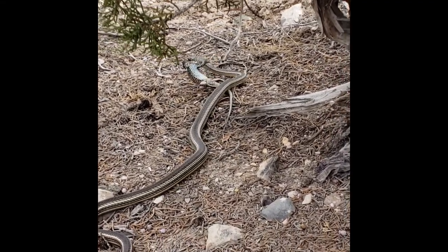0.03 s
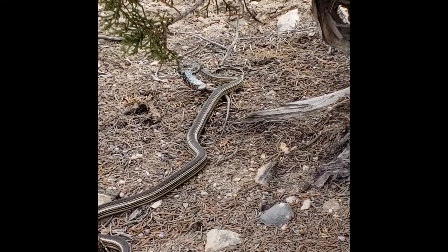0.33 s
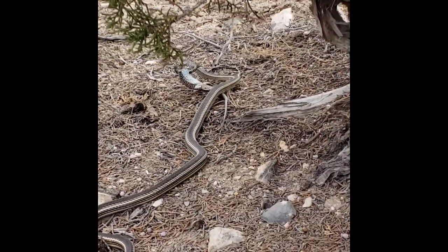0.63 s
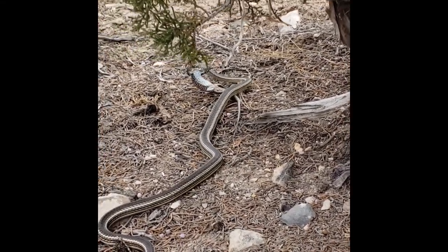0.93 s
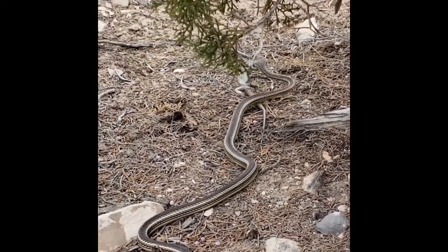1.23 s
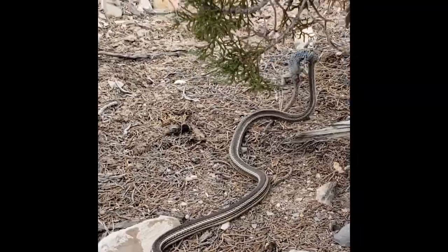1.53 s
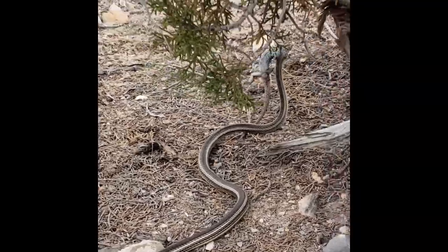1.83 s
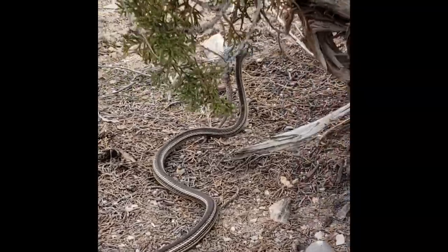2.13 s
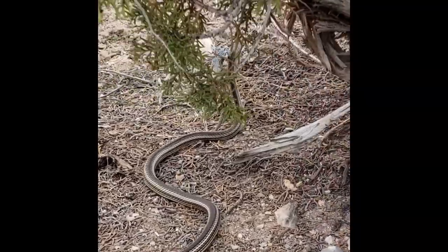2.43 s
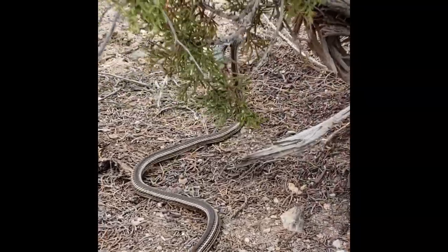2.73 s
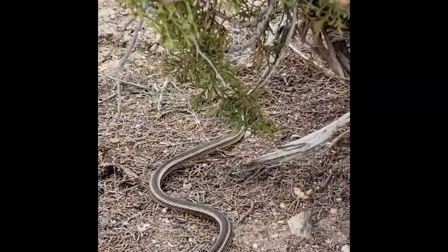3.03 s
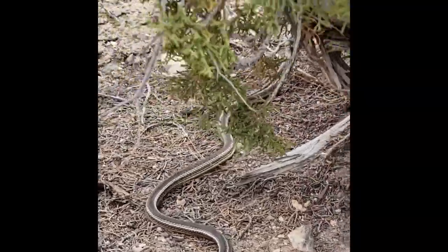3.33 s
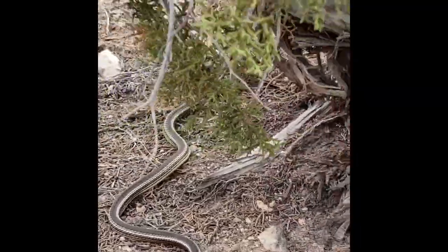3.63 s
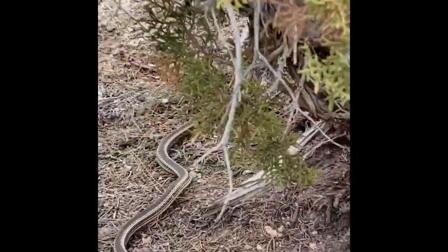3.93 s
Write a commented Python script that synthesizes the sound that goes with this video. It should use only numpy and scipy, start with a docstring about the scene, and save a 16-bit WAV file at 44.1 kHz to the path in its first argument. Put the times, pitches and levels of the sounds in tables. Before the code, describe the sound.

Faint ticking and hissing comes from a snake dragging prey over dry ground litter. Light footsteps crunch and twigs crack in the quiet open air, while a breeze rumbles on the phone microphone, gusting hard near the end.

```python
"""Outdoors, on dry needles and grit: a snake drags its prey and someone follows with scuffing steps.
Needles tick and hiss under the scales. Litter crunches underfoot, twigs snap, and sticks and
stones scrape as they catch and slip. Behind it lie quiet air, a faint hiss and a dull rustle.
A light wind flutters on the two microphone ports of a hand-held phone and ends in one gust."""
import sys
import numpy as np
from scipy import signal
from scipy.fft import rfft, irfft
from scipy.io import wavfile
from scipy.ndimage import uniform_filter1d

SR = 44100
rng = np.random.default_rng(int(sys.argv[2]) if len(sys.argv) > 2 else 0)


def master(y):
    """Save y as 16-bit WAV."""
    cut = np.clip(np.atleast_2d(y).T, -1, 1)
    pcm = np.round(cut * 32767)  # scale
    wavfile.write(sys.argv[1], SR, pcm.astype(np.int16))


N = 176400
T = np.arange(N) / SR
F = np.maximum(np.arange(N // 2 + 1) * SR / N, 1)
PORT_DELAY = np.exp(-2j * np.pi * F * 0.00048)  # the left port hears the ground 0.48 ms later


def undb(db):
    """Decibels to gain."""
    return 10 ** (np.asarray(db) / 20)


def unit(x):
    """Scale to rms 1."""
    return x / np.sqrt(np.mean(x ** 2))


def fader(rows, column=1):
    """Gain over time from a column of dB, dying away outside the rows."""
    points = np.array(rows)
    outside_s = np.maximum(points[0, 0] - T, 0) + np.maximum(T - points[-1, 0], 0)
    return undb(np.interp(T, points[:, 0], points[:, column])) * np.exp(-outside_s / 0.013)


def stereo_eq(rows):
    """Left and right gain over frequency, falling away below the first row."""
    hz, *sides = np.array(rows).T
    gain = undb([np.interp(np.log(F), np.log(hz), db) for db in sides])
    return gain * np.minimum(F / hz[0], 1) ** 2


def shape(x, gain):
    """Filter by a frequency response."""
    return irfft(rfft(x) * gain, N)


def band(hz, width):
    """Response of two like resonances in series; the width of each is a share of its centre."""
    return (1 / (1 + 1j * (F / hz - hz / F) / width)) ** 2


def waver(rate_hz):
    """Smooth random movement with rms 1."""
    return unit(shape(rng.standard_normal(N), np.exp(-(F / rate_hz) ** 2)))


def grains(per_second, spread_db):
    """Tiny fractures: clicks at random times, their sizes scattered by spread_db."""
    hits = rng.random(N) < per_second / SR
    polarity = rng.choice([-1, 1], N)
    size = undb(spread_db * np.minimum(rng.exponential(1, N), 4))
    return unit(hits * polarity * size)


def ports(x):
    """Sound from the ground reaches the left port later and duller."""
    left = shape(x, PORT_DELAY / np.sqrt(1 + (F / 1900) ** 4))
    return np.array([left, x])


# The tone of still air. Each row: frequency in Hz, left and right EQ gain in dB.
AIR_EQ = [(28.5, -13, 3), (81, -7, -4.5), (186, -16.5, -16), (487, -24, -24), (1040, -27, -28),
          (1500, -27.5, -31), (2440, -29, -36), (3900, -34.5, -35.5), (5800, -37.5, -42.5),
          (8930, -45, -47), (11300, -37, -38.5), (15000, -33.5, -35)]

def air():
    """A quiet outdoor bed, slightly restless."""
    bed = unit(shape(rng.standard_normal((2, N)), stereo_eq(AIR_EQ)))
    return bed * undb(-68.5 + 0.17 * waver(2.1))


# The drift of the background hiss. Each row: time in seconds, left level in dB, centre in Hz.
HISS_DRIFT = [(0, -75.5, 1940), (0.551, -79, 1940), (.85, -77, 1870), (1.3, -77.5, 1920),
              (2.602, -77, 2024)]

def hiss():
    """A faint, narrow hiss, mostly on the left, swells and drifts in pitch."""
    at, db, hz = np.array(HISS_DRIFT).T
    low_noise = shape(rng.standard_normal((2, N)), 1 / (1 + (F / 230) ** 2))
    carrier = np.cos(2 * np.pi * np.cumsum(np.interp(T, at, hz)) / SR)
    level = undb(np.interp(T, at, db) + 1.35 * waver(6.1))
    return unit(low_noise * carrier) * level * undb([[0], [-17]])


# The light breeze, then the closing gust.
# Each row: time in seconds, force on the left port in dB, force on the right port in dB.
BREEZE = [(0, -52.5, -61), (0.12, -52.5, -64.5), (0.35, -62.5, -60.5), (0.58, -79, -77), (0.8, -76, -76),
          (0.92, -58.5, -51.5), (1.1, -49, -86), (1.2, -55.5, -64), (1.33, -41.5, -60), (1.52, -61.5, -71),
          (1.78, -47.5, -51), (2.05, -62, -110), (2.22, -59.5, -70), (2.38, -50.5, -105),
          (2.62, -48.5, -67), (2.75, -56.5, -59.5), (2.95, -56.5, -64.5), (3.27, -43.5, -56)]
GUST = [(3.28, -45, -64), (3.34, -25.5, -40.5), (3.42, -20.5, -34), (3.48, -14, -39), (3.53, -16.5, -37),
        (3.58, -27, -41), (3.64, -32, -44), (3.71, -27, -58), (3.79, -27.5, -58.5), (3.87, -35, -63),
        (3.95, -28, -55), (4.0, -43.5, -67)]

def wind():
    """Turbulence on each port; the harder it blows, the higher the rumble reaches."""
    octaves_per_db, rolloff_order = 0.0212, 3.4
    out = np.zeros((2, N))
    for side, trim_db in enumerate((-3, 1)):
        force = fader(list(BREEZE) + list(GUST), column=side + 1) + 1e-9
        excess_db = np.maximum(20 * np.log10(force) + 45, 0)
        corner_hz = 68.1 * 2 ** (octaves_per_db * excess_db)
        noise, rumble = rng.standard_normal(N), 0
        for hz in 25 * 2 ** (np.arange(12) / 2):  # half-octave bands under a moving low-pass
            window = np.maximum(1 - np.abs(2 * np.log2(F / hz)), 0)
            part = shape(noise, window / np.sqrt(1 + (49 / F) ** 6))
            body = 1 / np.sqrt(1 + (hz / corner_hz) ** (2 * rolloff_order))
            skirt = undb(-23.5) / (1 + (hz / 450) ** 3) / (1 + force / 0.0019)  # mids in the lulls
            rumble += part * (body + skirt)
        running_rms = np.sqrt(uniform_filter1d(rumble ** 2, int(0.07 * SR)) + 1e-18)
        out[side] = rumble / running_rms * force * undb(trim_db)
    return out


# Single buffets of wind. Each row: centre time in seconds, level in dB, pitch in Hz.
EDDIES = [(0.041, -35, 46), (0.132, -44, 65.5), (1.049, -36.5, 46), (1.122, -39.5, 49), (1.387, -37, 61.4),
          (1.607, -46, 45), (1.738, -38, 54.7), (1.818, -35.5, 50.7), (2.12, -41.5, 50.4),
          (2.302, -26.5, 72), (2.5, -38.5, 60.4), (2.585, -28.5, 62.4), (3.351, -27.5, 171),
          (3.425, -17, 58), (3.4654, -9.5, 194), (3.494, -9, 216), (3.508, -23, 92), (3.53, -15.5, 64),
          (3.54, -19, 228), (3.786, -15.5, 87), (3.828, -14, 76)]

def eddies():
    """Eddies swing the pressure at the left port, steepen when strong and shed smaller ones."""
    left = np.zeros(N)
    for at, db, hz in EDDIES:
        cycles = hz * (T - at)
        swell = undb(db) * np.exp(-(cycles / 0.67) ** 2)
        swing = np.cos(2 * np.pi * cycles)
        steepening = 0.35 * swell * np.cos(4 * np.pi * cycles)
        shed = undb(-35) * unit(shape(rng.standard_normal(N), band(2.35 * hz, width=0.84)))
        left += swell * (swing + steepening + shed)
    return np.array([left, np.zeros(N)])


# Soft bumps. Each row: start in seconds, peak in dB, pitch in Hz.
BUMPS = [(1.531, -37, 147), (1.657, -37.5, 157), (1.74, -44, 218), (2.797, -38.5, 211), (3.914, -33.5, 270)]

def bumps():
    """Damped thuds at the right port, each gone in about a cycle."""
    right = np.zeros(N)
    for at, db, hz in BUMPS:
        cycles = np.maximum(T - at, 0) * hz
        envelope = (1 - np.exp(-cycles / 0.12)) * np.exp(-cycles / 0.41)
        thud = np.sin(2 * np.pi * cycles) * envelope
        right += undb(db) * thud / np.abs(thud).max()
    return np.array([np.zeros(N), right])


# The swells of the low rustle. Each row: time in seconds, right level in dB.
RUSTLE_SWELLS = [(0, -77), (.08, -64.5), (.25, -80.5), (.5, -88.5), (.95, -100), (1.05, -70), (1.18, -86),
                 (1.3, -75), (1.6, -74.5), (1.75, -77), (2.25, -94), (2.36, -73), (2.52, -91)]

def dull_rustle():
    """A dull, low rustle that swells with the movement, a little to the left."""
    rustle = unit(shape(rng.standard_normal((2, N)), band(340, width=0.85)))
    return rustle * fader(RUSTLE_SWELLS) * undb(2.4 * waver(23)) * undb([[3.5], [0]])


# Short scrapes of sticks and stones. Each row: time of the peak in seconds, level in dB,
# pitch in Hz, fade in seconds, bandwidth as a share of the pitch.
SCRAPES = [(1.308, -77.5, 3580, 0.084, 0.18), (1.552, -71.5, 2300, 0.025, 2.7),
           (1.896, -61, 665, 0.17, 0.37), (2.131, -64.5, 1280, 0.042, 0.65),
           (2.969, -61, 1070, 0.012, 0.82), (3.008, -47, 662, 0.01, .2), (3.037, -47, 596, 0.021, 0.49),
           (3.074, -58, 2590, 0.0097, 0.23), (3.509, -54, 907, 0.06, 0.25),
           (3.768, -64.5, 1430, 0.056, 0.72), (3.813, -63, 1480, 0.03, 0.53),
           (3.95, -66, 6800, 0.016, 0.58)]

def scrapes():
    """Uneven stick-slip ticks ring a stick or stone; the grip comes faster than it fades."""
    out = np.zeros(N)
    for at, db, hz, fade_s, width in SCRAPES:
        slope_s = np.where(T < at, 0.85 * fade_s, fade_s)
        swell = np.exp(-2 * ((T - at) / slope_s) ** 2)
        ticks = grains(1200, spread_db=3.5)
        out += undb(db) * swell * unit(shape(ticks, band(hz, width)))
    return ports(out)


# The ring of a twig. Each row: multiple of its pitch, bandwidth as a share of the centre, gain in dB.
TWIG_MODES = [(1, 1.0, 8.5), (2.05, 0.24, 4.5), (2.6, 0.29, -13.5), (3.7, .18, -6)]
# Twigs breaking. Each row: start in seconds, peak in dB, pitch in Hz, splinter decay in milliseconds.
SNAPS = [(0.074, -72, 704, 3), (1.052, -61.5, 700, 1.3), (1.523, -39, 1770, 1.5), (1.809, -44, 3220, 1.7),
         (1.949, -50, 3900, 2.2), (2.152, -49.5, 1350, 0.44), (2.165, -49.5, 704, 2.4),
         (2.235, -47.5, 700, 0.8), (2.305, -43.5, 1780, 1.9), (2.688, -54, 1510, 17),
         (2.962, -59, 1460, 2.6), (3.139, -51, 4500, 4), (3.435, -53, 1560, 1.1), (3.621, -54, 2620, 1.1)]

def twigs():
    """One sharp break and a burst of splinters ring each twig, then the litter faintly settles."""
    out = np.zeros(N)
    for at, db, hz, decay_ms in SNAPS:
        age = np.maximum(T - at, 0)
        fracture = np.arange(N) == int(at * SR)
        splinters = np.exp(-1000 * age / decay_ms)
        settling = undb(-20) * np.exp(-age / 0.056)
        debris = undb(-15) * rng.standard_normal(N) * (T >= at) * (splinters + settling)
        wood = sum(undb(mode_db) * band(ratio * hz, width) for ratio, width, mode_db in TWIG_MODES)
        crack = shape(fracture + debris, wood / (1 + (F / 8100) ** 4))
        out += undb(db) * crack / np.abs(crack).max()
    return ports(out)


# The tone of crunching litter. Each row: frequency in Hz, left and right EQ gain in dB.
LITTER_EQ = [(338, -6, -5.5), (633, -6.5, -7.5), (1000, -7, -2.5), (1240, -4, -3.5), (2070, -22, -14),
             (3400, -28.5, -16), (3880, -28, -9), (5280, -40, -19.5), (6700, -25.5, -20),
             (7550, -37.5, -29.5), (12300, -42, -58)]
# The steps, one list per scuff. Each row: time in seconds, crunch fader in dB, grit fader in dB.
SCUFFS = [
    [(1.73, -82, -94), (1.786, -74.5, -65), (1.936, -65, -75.5), (2.084, -78, -80), (2.132, -75.5, -77.5),
     (2.296, -77, -79.5), (2.304, -69.5, -91), (2.44, -97, -113)],
    [(2.964, -68.5, -71), (3.012, -71.5, -65), (3.044, -63.5, -61), (3.066, -73, -70), (3.078, -64.5, -70),
     (3.092, -71, -73), (3.228, -105, -76.5), (3.26, -98, -83)],
    [(3.28, -82, -78.5), (3.294, -77, -74), (3.386, -62.5, -70.5), (3.414, -70.5, -75),
     (3.502, -84.5, -74.5), (3.55, -67, -72.5), (3.59, -66.5, -72.5), (3.7, -83, -86)],
]

def scuffs():
    """Litter gives way underfoot in little jerks: a coarse crunch and crisp fine grit."""
    shared_power, crossover_hz = 0.81, 2770
    common = grains(1500, spread_db=0)
    both_ports = np.array([shape(common, PORT_DELAY), common])
    each_port = np.array([grains(9000, spread_db=2.5) for _ in range(2)])
    ticks = np.sqrt(shared_power) * both_ports + np.sqrt(1 - shared_power) * each_port
    low_share = 1 / (1 + (F / crossover_hz) ** 6)
    crunch = unit(shape(ticks, stereo_eq(LITTER_EQ) * np.sqrt(low_share)))
    grit = unit(shape(ticks, stereo_eq(LITTER_EQ) * np.sqrt(1 - low_share)))
    crunch *= sum(fader(step) for step in SCUFFS) * undb(7 + 1.4 * waver(45))
    grit *= sum(fader(step, column=2) for step in SCUFFS) * undb(1 + 0.5 * waver(57))
    return crunch + grit


# The tone of needles under the scales. Each row: frequency in Hz, left and right EQ gain in dB.
NEEDLE_EQ = [(1390, -32, -11), (2760, -16.5, -8), (3900, -11, -0.5), (5000, -14.5, -13), (6870, -8.5, -9.5),
             (7400, -5.5, -22.5), (8470, -16, -21.5), (9220, -14, -6.5), (10130, -16.5, -5.5),
             (11620, -6.5, -0.5), (12060, -14.5, 4.5), (14730, -8, -9)]
# The snake's strokes, then their airy top. Each row: time in seconds, fader in dB.
STROKES = [(0.9, -83.5), (1.22, -82), (1.375, -65), (1.43, -68), (1.65, -72), (1.82, -64.5), (1.87, -69),
           (1.99, -66), (2.05, -72.5), (2.29, -74.5), (2.38, -70.5), (2.45, -75.5), (2.95, -78),
           (3.03, -73), (3.49, -82), (3.58, -73.5), (3.9, -69.5), (3.95, -68.5), (4.0, -70.5)]
AIRY_STROKES = [(1.25, -90), (1.37, -80), (1.6, -69.5), (1.85, -71), (2.08, -78), (2.29, -86), (2.36, -69),
                (2.46, -89)]

def snake_slide():
    """Scales brush countless dry needles; the quicker strokes add an airy top on the right."""
    ticks = np.array([grains(14000, spread_db=3.5) for _ in range(2)])
    needles = unit(shape(ticks, stereo_eq(NEEDLE_EQ))) * fader(STROKES) * undb(1.5)
    sheen = shape(rng.standard_normal((2, N)), band(15000, width=0.25)) * undb([[-13], [0]])
    airy_top = unit(sheen) * fader(AIRY_STROKES)
    flicker = undb(0.7 * waver(25))
    return (needles + airy_top) * flicker


def scene():
    """The stereo mix: background, rumble on the ports, ground sounds and the snake."""
    background = air() + hiss()
    on_ports = wind() + eddies() + bumps()
    ground = dull_rustle() + scrapes() + twigs() + scuffs()
    return background + on_ports + ground + snake_slide()


def record(dry):
    """The phone cuts the deepest rumble and the very top."""
    low_cut = signal.butter(2, 20.1, "high", fs=SR, output="sos")
    high_cut = signal.ellip(10, 0.2, 70, 15650, fs=SR, output="sos")
    return signal.sosfilt(high_cut, signal.sosfiltfilt(low_cut, dry))


dry = scene()
out = record(dry)
master(out)
```